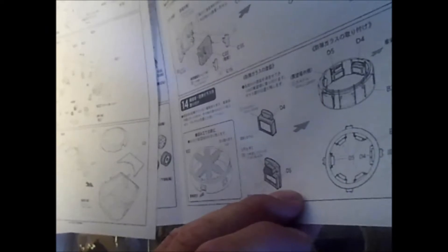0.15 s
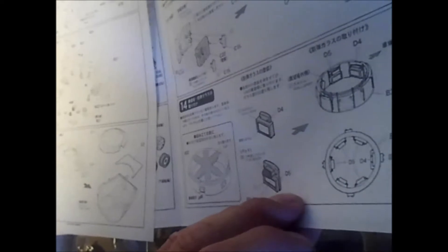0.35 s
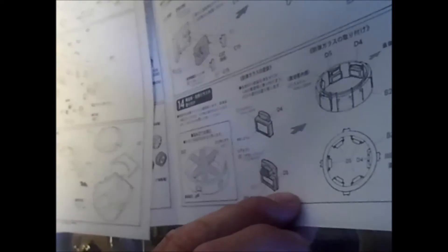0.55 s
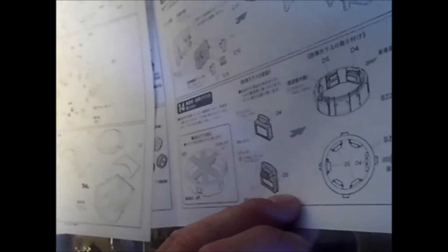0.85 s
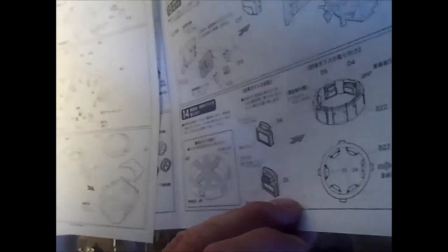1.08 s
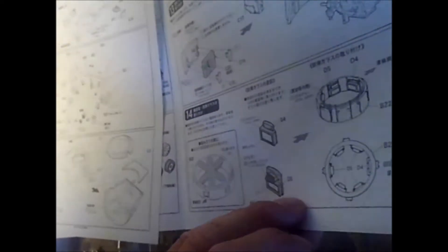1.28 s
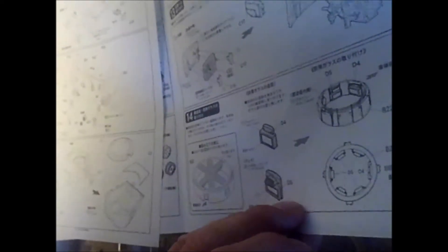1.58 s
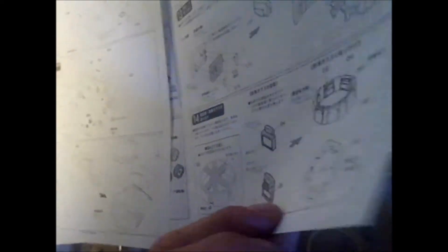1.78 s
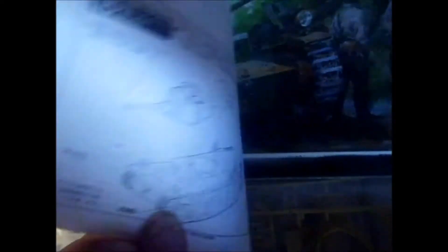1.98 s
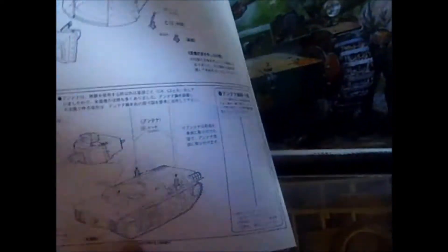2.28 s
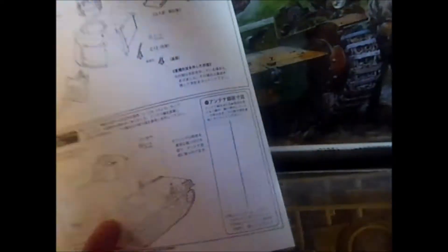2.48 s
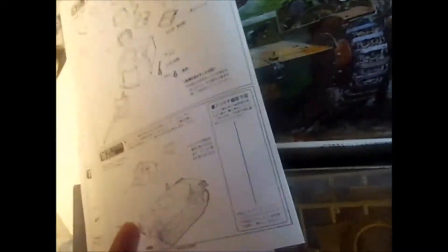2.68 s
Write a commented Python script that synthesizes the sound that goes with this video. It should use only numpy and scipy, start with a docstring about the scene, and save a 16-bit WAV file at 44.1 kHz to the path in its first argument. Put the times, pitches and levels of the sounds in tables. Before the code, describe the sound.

Page turning in a paper booklet, close and mono in a small room. Faint slides and crinkles until 0.6 s, soft dull bumps and a tiny tick around 0.7-1.2 s, quiet rasping to 1.7 s. Bright sliding swells from 1.75 s into a very loud, clipped papery snap at 2.1 s; light rustles follow, with a smaller flap at 2.57 s. Low hiss, faint hum and thin high whine underneath.

```python
"""A paper booklet is handled close to a mono microphone in a small room: pages slide (dense grains hiss,
rasp and drive resonances) and crinkle (short bright noise), and the booklet bumps softly (swelling modes).
A page then snaps over hard enough to overload the microphone (noise clap, pitched pop, thump, ring),
and settles with more slides and a smaller flap. Filtered noise, a mains hum and a thin electrical
whine lie underneath."""
import sys
import numpy as np
from scipy import signal
from scipy.fft import rfft, irfft
from scipy.io import wavfile
from scipy.ndimage import uniform_filter1d

SR = 44100
rng = np.random.default_rng(int(sys.argv[2]) if len(sys.argv) > 2 else 0)


def master_out(mix):
    """Clip the mix to full scale and print it as 16-bit PCM to the path in sys.argv[1]."""
    frames = np.transpose(np.atleast_2d(mix))
    ceiling = np.clip(frames, -1, 1)
    pcm = np.round(ceiling * 32767).astype(np.int16)
    wavfile.write(sys.argv[1], SR, pcm)


N = 125685
T = np.arange(N) / SR
T_BURST = T[:SR // 2]  # time axis of one short event

GRAINS_PER_S, GRAIN_SPREAD_DB = 11000, 3
SNAP_ATTACK_S = 0.00088  # crinkles and flaps

# crackle of bending paper: (frequency [Hz], density [dB per Hz])
CRINKLE_SPECTRUM = [(400, -26), (1500, -6), (3000, -5.5), (5500, -1), (8000, 1), (10500, 3.5),
                    (12500, -6.5), (16000, -4.5)]


def undb(db):
    """Amplitude ratio of a level in dB."""
    return 10 ** (np.asarray(db) / 20)


def unit(x):
    """Scale to rms 1."""
    return x / np.sqrt(np.mean(x ** 2))


def blow(x):
    """Scale a short sound to the energy of 10 ms at rms 1."""
    return x / np.sqrt(np.sum(x ** 2) / (0.01 * SR))


def colour(x, points):
    """Causal minimum-phase filter through (Hz, dB) points, by folding the cepstrum."""
    hz, db = np.array(points, float).T
    grid_hz = np.maximum(np.fft.rfftfreq(4096, 1 / SR), 1)
    gain = undb(np.interp(np.log(grid_hz), np.log(hz), db))
    cepstrum = irfft(np.log(gain))
    half = len(cepstrum) // 2
    cepstrum[1:half] *= 2
    cepstrum[half + 1:] = 0
    impulse = irfft(np.exp(rfft(cepstrum)))
    return signal.fftconvolve(x, impulse)[:len(x)]


def fade(t60_s, hold_s=0):
    """Half a second of envelope: hold, then exponential decay."""
    return np.exp(-np.log(1000) * np.maximum(T_BURST - hold_s, 0) / t60_s)


def swell(attack_s):
    """Half a second of gain that rises smoothly to 1."""
    return np.sin(np.pi / 2 * np.minimum(T_BURST / attack_s, 1)) ** 2


def burst(t60_s, hold_s=0):
    """A puff of white noise that dies away."""
    return rng.standard_normal(SR // 2) * fade(t60_s, hold_s)


def ring(modes):
    """Sum of damped sines (Hz, dB, t60 s) at random phases."""
    total = 0
    for hz, db, t60_s in modes:
        sine = np.sin(2 * np.pi * (hz * T_BURST + rng.random()))
        total = total + undb(db) * fade(t60_s) * sine
    return total


def add(out, start_s, x):
    """Mix x into out at start_s."""
    i = int(start_s * SR)
    out[i:i + len(x)] += x[:N - i]


def walk(rate_hz):
    """Smooth random wander of rms 1."""
    step = int(SR / rate_hz)
    held = rng.standard_normal(N)[np.arange(N) // step]
    return unit(uniform_filter1d(held, step))


def grains():
    """Fibres catching and letting go: dense clicks of uneven size and random sign."""
    size = undb(GRAIN_SPREAD_DB * np.minimum(rng.exponential(size=N), 5))
    return rng.choice([-1, 1], N) * size * (rng.random(N) < GRAINS_PER_S / SR)


def stroke(full_s, rise_s, hold_s, fall_s):
    """Speed of a sliding sheet: it gathers, holds and dies; rise and fall each span 20 dB."""
    before = (np.maximum(full_s - T, 0) / rise_s) ** 1.29
    after = (np.maximum(T - full_s - hold_s, 0) / fall_s) ** 1.09
    return undb(-20 * (before + after))


def background():
    """Room air and microphone hiss as coloured noise; mains hum and a steady whine as sines."""
    # (frequency [Hz], density [dB per Hz])
    air_spectrum = [(15, -27.5), (25, -4.5), (59, -8.5), (119, -9), (250, -11), (470, -14.5), (850, -18.5),
                    (1500, -23), (3000, -27), (7300, -32.5), (9000, -29.5), (11200, -26), (13200, -28),
                    (15500, -39.5)]
    hum_hz, hum_db = 49.5, -51.5
    whine_hz, whine_db = 14455.3, -47
    air_db = -50.5
    hum = undb(hum_db) * unit(np.sin(2 * np.pi * hum_hz * T))
    whine = undb(whine_db) * unit(np.sin(2 * np.pi * whine_hz * T))
    air = undb(air_db) * unit(colour(rng.standard_normal(N), air_spectrum))
    return air + hum + whine


def slides():
    """Paper on paper: each stroke's speed drives fibre grains that hiss and rasp."""
    # strokes: (full speed at [s], rise [s], hold [s], fall [s], hiss [dB], rasp [dB])
    strokes = [(0.08, .15, 0.13, 0.24, -58, -71), (0.522, .1, 0.061, .08, -63, -57.5),
               (1.098, 0.16, .07, .12, -73, -56.5), (1.32, 0.067, 0.077, .05, -61.5, -59),
               (1.496, 0.096, 0.066, .06, -59.5, -54), (1.626, .03, 0.018, 0.022, -51.5, -52),
               (1.696, 0.037, 0.056, .05, -49, -41.5), (1.781, 0.078, 0.063, 0.18, -30, -35),
               (1.934, 0.054, 0.066, 0.11, -27.5, -35), (2.083, 0.013, 0.0037, .008, -29, -25.5),
               (2.218, 0.027, .01, 0.1, -39.5, -40), (2.361, 0.08, .025, 0.047, -39.5, -37),
               (2.453, 0.029, 0.031, 0.081, -40, -43.5), (2.528, 0.029, 0.014, .02, -30, -40),
               (2.554, 0.02, 0.0083, .01, -26, -32.5), (2.580, .006, 0.0047, 0.013, -24, -35.5),
               (2.669, 0.01, 0.013, 0.063, -48, -42.5)]
    # bright hiss of the fibres: (frequency [Hz], density [dB per Hz])
    hiss_spectrum = [(1500, -26.5), (3500, -19), (5000, -9.5), (6500, -9.5), (8000, -5.5), (10500, -1),
                     (12000, -5), (13500, -13), (16000, -9)]
    # duller rasp of the sheet: (frequency [Hz], density [dB per Hz])
    rasp_spectrum = [(100, -4), (300, -5), (600, 1.5), (750, -6.5), (1050, -0.5), (1500, -5), (2000, 1),
                     (2700, -2), (3600, -2), (5000, -5.5), (7000, -5), (14000, -16.5)]
    flutter_db, flutter_hz = 1.0, 150
    hiss_power, rasp_power = 0, 0
    for full_s, rise_s, hold_s, fall_s, hiss_db, rasp_db in strokes:
        speed = stroke(full_s, rise_s, hold_s, fall_s)
        hiss_power = hiss_power + (speed * undb(hiss_db)) ** 2
        rasp_power = rasp_power + (speed * undb(rasp_db)) ** 2
    hiss = np.sqrt(hiss_power) * unit(colour(grains(), hiss_spectrum))
    rasp = np.sqrt(rasp_power) * unit(colour(grains(), rasp_spectrum))
    return (hiss + rasp) * undb(flutter_db * walk(flutter_hz))


def crinkles():
    """The bending page buckles: short bright noise bursts, and one ringing tick."""
    # crinkles: (time [s], level [dB], t60 [s])
    clusters = [(0.168, -48, .02), (0.267, -50.5, 0.022), (0.332, -52, .02), (0.369, -49, .007),
                (0.402, -52, .02), (0.532, -49.5, 0.016), (0.548, -50, 0.016), (0.577, -53, .025),
                (0.603, -53, .02), (2.046, -31, .015), (2.069, -37, .02), (2.0853, -24, 0.007),
                (2.086, -13.5, 0.027), (2.0894, -12.5, 0.013), (2.0964, -17.5, 0.034), (2.442, -39, 0.0095),
                (2.558, -27.5, .012), (2.5708, -31, 0.016), (2.678, -41, 0.011), (2.689, -41, .018)]
    # tick: (frequency [Hz], level [dB], t60 [s])
    tick_modes = [(2900, -1, 0.017), (3760, -4, 0.019), (7920, -12, 0.022)]
    tick_s, tick_db, tick_attack_s = 0.9352, -43.5, 0.0027
    out = np.zeros(N)
    for start_s, db, t60_s in clusters:
        crackle = burst(t60_s, hold_s=0.0022) * swell(SNAP_ATTACK_S)
        add(out, start_s, undb(db) * blow(colour(crackle, CRINKLE_SPECTRUM)))
    tick_noise = blow(colour(burst(0.02), CRINKLE_SPECTRUM))
    tick = blow(ring(tick_modes)) + undb(-10) * tick_noise
    add(out, tick_s, undb(tick_db) * blow(tick * swell(tick_attack_s)))
    return out


def scrapes():
    """Friction grains drive one resonance of the sheet or of the booklet."""
    # (full speed at [s], rise [s], hold [s], fall [s], centre [Hz], width per filter pass [Hz], level [dB])
    drags = [(0.40, 0.027, .2, 0.055, 3060, 300, -63.5), (1.713, 0.044, 0.08, .05, 586, 90, -43.5),
             (1.814, .02, 0.016, 0.052, 585, 60, -32.5), (1.792, 0.064, 0.036, 0.11, 4900, 1510, -35.5),
             (2.227, 0.018, 0.047, 0.019, 3450, 700, -42.5), (2.511, .02, .012, 0.048, 973, 180, -41.5),
             (2.558, 0.043, 0.022, 0.037, 1730, 500, -37)]
    out = np.zeros(N)
    for full_s, rise_s, hold_s, fall_s, hz, width_hz, db in drags:
        b, a = signal.iirpeak(hz, hz / width_hz, fs=SR)
        speed = stroke(full_s, rise_s, hold_s, fall_s)
        resonance = signal.lfilter(b, a, signal.lfilter(b, a, grains()))
        tone = speed * resonance
        # match the energy of the speed curve
        out += undb(db) * tone * np.sqrt(np.sum(speed ** 2) / np.sum(tone ** 2))
    return out


def bumps():
    """A soft contact of the held booklet swells its modes while the paper scuffs."""
    # bumps: (time [s], level [dB], contact [s], pitch ratio, scuff against ring [dB])
    contacts = [(0.712, -45, 0.0064, 1, -8), (0.7542, -35.5, 0.01, 1.024, -8),
                (0.9745, -37, 0.0073, 1.02, -6.5), (1.044, -35, 0.0065, 0.99, -11),
                (1.108, -46, .01, 0.98, -4), (1.133, -41, 0.0034, .99, -5.5), (1.159, -44, .01, 1.06, -5),
                (1.801, -27, 0.025, 1.0, -10), (2.625, -44.5, .012, 0.945, -7)]
    # ring: (frequency at pitch ratio 1 [Hz], level [dB], t60 [s])
    modes = [(561, -6.5, 0.091), (591.7, 0, 0.054), (839, -12.5, 0.045), (974, -15.5, .03),
             (1142, -14.5, 0.032), (1852, -9.5, 0.038), (1984, -7, 0.039), (2580, -17, .03),
             (2936, -17.5, .03)]
    # scuff: (frequency [Hz], density [dB per Hz])
    scuff_spectrum = [(150, -3), (600, 0), (1000, 3), (1500, -6.5), (2000, -4.5), (3500, -7.5),
                      (7000, -10.5), (14000, -15.5)]
    attack_s, scuff_t60_s = 0.0058, 0.027
    out = np.zeros(N)
    for start_s, db, contact_s, pitch, scuff_db in contacts:
        body = 0
        for hz, mode_db, t60_s in modes:
            steady = ring([(hz * pitch, mode_db, np.inf)])
            body = body + steady * fade(t60_s, contact_s)
        scuff = colour(burst(scuff_t60_s, contact_s), scuff_spectrum)
        body = blow(body * swell(attack_s))
        scuff = undb(scuff_db) * blow(scuff * swell(attack_s / 2))
        add(out, start_s, undb(db) * (body + scuff))
    return out


def flaps():
    """The sheet snaps taut: a clap of air, a short pitched pop, a low thump and a longer ring."""
    # (time [s], level [dB], pop [Hz], pop [dB], pop t60 [s], clap t60 [s], thump [dB])
    snaps = [(1.799, -29.5, 1063, -4, .04, 0.05, -11), (1.981, -33, 846, 0, 0.028, .05, -8),
             (2.033, -35.5, 1400, -6, .02, .05, -14), (2.046, -34, 1700, -6, .03, 0.051, -19),
             (2.069, -30.5, 1920, -4, .03, .07, -11), (2.0893, -11, 1153, 3, 0.026, 0.057, -29),
             (2.0972, 1.5, 1102, -11, 0.036, 0.056, -20.5), (2.221, -37, 450, -4, .02, .04, -3),
             (2.4389, -32, 1130, 4, 0.015, 0.046, -3.5), (2.5714, -23, 1024, 3.5, 0.044, 0.063, -13.5)]
    # clap: (frequency [Hz], density [dB per Hz])
    clap_spectrum = [(60, -24.5), (150, -13), (400, -4.5), (650, -9.5), (900, 0), (1400, 0), (2000, 1),
                     (3100, -4), (4200, -7), (6500, -14), (10000, -21), (16000, -35)]
    # thump: (frequency [Hz], density [dB per Hz])
    thump_spectrum = [(50, -8), (90, 2.5), (160, -3.5), (240, 1), (450, -6.5), (900, -16), (3000, -57)]
    # ring of the booklet and its surroundings: (frequency [Hz], level [dB], t60 [s])
    ring_modes = [(819, -1, .13), (909.6, 2.5, 0.11), (995, -2, 0.08), (1089, 5.5, 0.069),
                  (1188, -2, 0.075), (1444, -4.5, 0.097), (1810, -7, 0.11), (1888, -4, 0.056),
                  (1946, -5.5, 0.14), (2037, -5, 0.11), (2136, -8, 0.16), (2397, -2, 0.059),
                  (3100, 0, 0.068), (3600, -14, 0.19)]
    clap_hold_s, thump_t60_s, ring_db = 0.0046, 0.11, -5
    out = np.zeros(N)
    for start_s, db, pop_hz, pop_db, pop_t60_s, clap_t60_s, thump_db in snaps:
        clap = blow(colour(burst(clap_t60_s, clap_hold_s), clap_spectrum))
        pop = undb(pop_db) * blow(ring([(pop_hz, 0, pop_t60_s)]))
        thump = undb(thump_db) * blow(colour(burst(thump_t60_s), thump_spectrum))
        body = undb(ring_db) * blow(ring(ring_modes))
        snap = blow(clap + pop + thump + body)
        add(out, start_s, undb(db) * snap * swell(SNAP_ATTACK_S))
    return out


def room(x):
    """A short diffuse tail of decaying noise whose treble dies slightly sooner."""
    tail_db, t60_s, treble_t60_s, gap_s, split_hz = -16, 0.28, 0.26, 0.006, 4500
    low = signal.butter(2, split_hz, fs=SR, output="sos")
    high = signal.butter(2, split_hz, "high", fs=SR, output="sos")
    tail = signal.sosfilt(low, burst(t60_s)) + signal.sosfilt(high, burst(treble_t60_s))
    tail = tail * (T_BURST > gap_s)
    tail = tail / np.sqrt(np.sum(tail ** 2))
    return x + undb(tail_db) * signal.fftconvolve(x, tail)[:N]


def scene():
    """All the paper sounds in the room over the background, the same in both channels."""
    paper = slides() + crinkles() + scrapes() + bumps() + flaps()
    mono = room(paper) + background()
    return np.array([mono, mono])


def record(dry):
    """The microphone flattens the loudest peaks and dulls the highest treble; the top is cut."""
    ceiling, knee = 0.7, 3.4  # full-scale amplitude, sharpness
    mic_top_hz, cut_hz = 15000, 15650
    clipped = dry / (1 + np.abs(dry / ceiling) ** knee) ** (1 / knee)
    dulled = signal.sosfilt(signal.butter(2, mic_top_hz, fs=SR, output="sos"), clipped)
    return signal.sosfilt(signal.ellip(10, 0.1, 90, cut_hz, fs=SR, output="sos"), dulled)


dry = scene()
out = record(dry)
master_out(out)
```